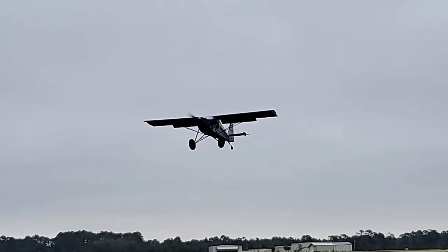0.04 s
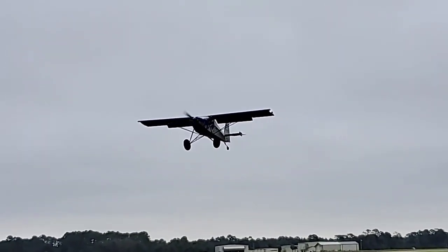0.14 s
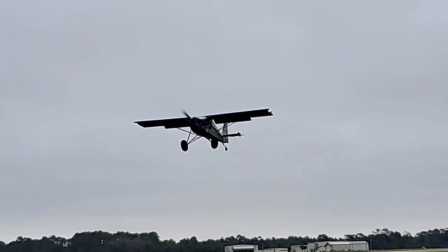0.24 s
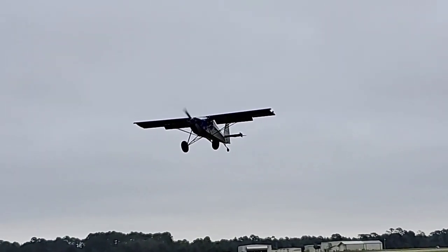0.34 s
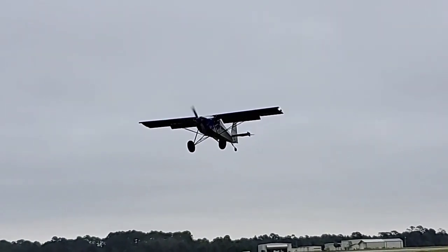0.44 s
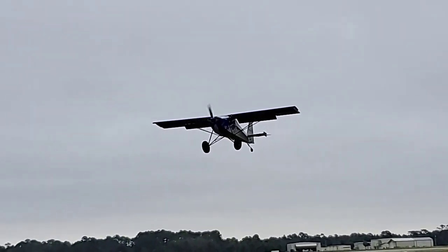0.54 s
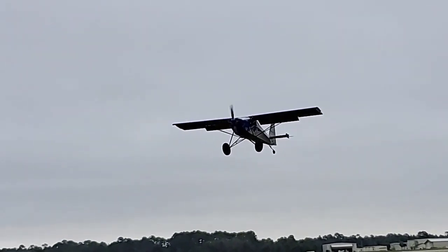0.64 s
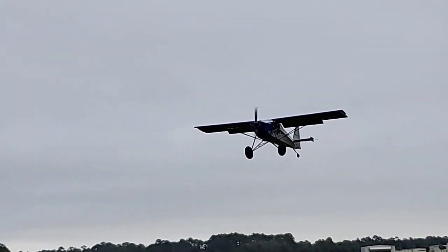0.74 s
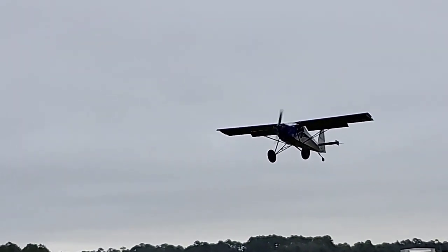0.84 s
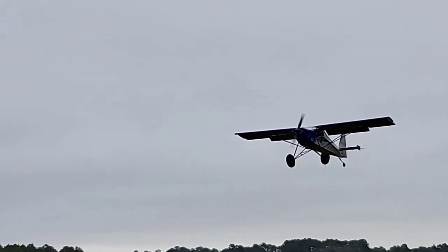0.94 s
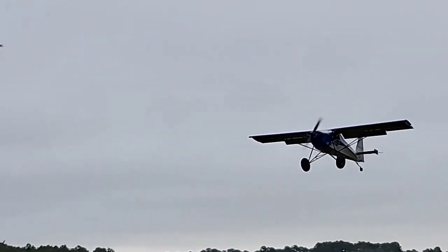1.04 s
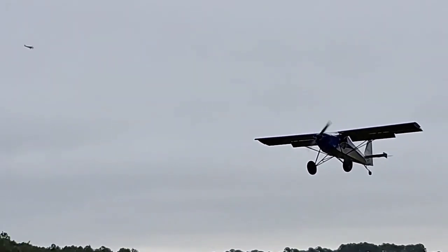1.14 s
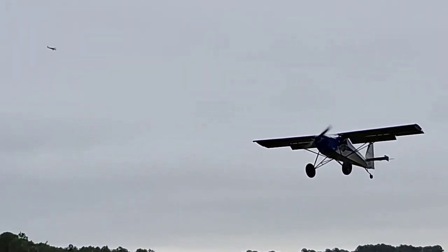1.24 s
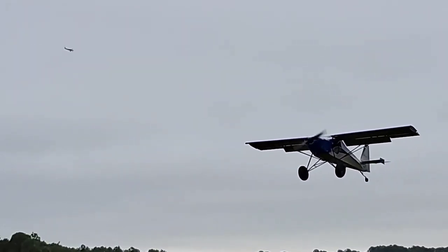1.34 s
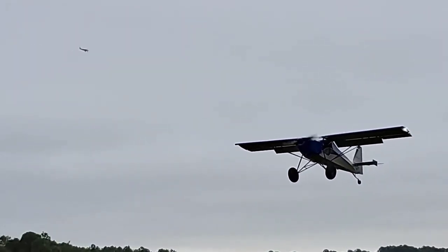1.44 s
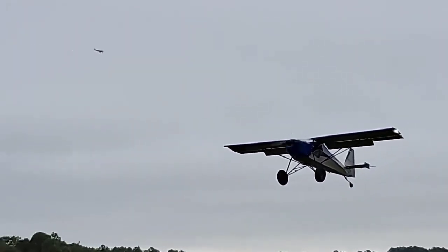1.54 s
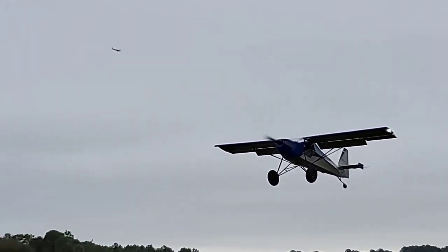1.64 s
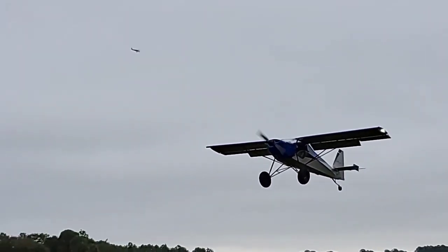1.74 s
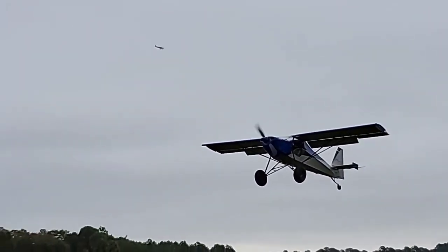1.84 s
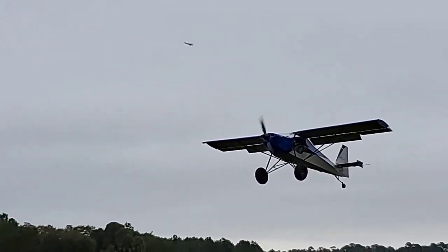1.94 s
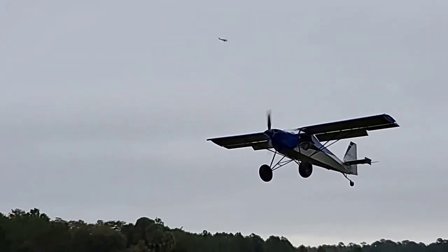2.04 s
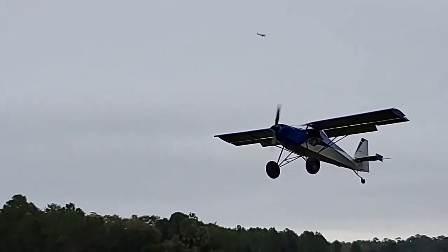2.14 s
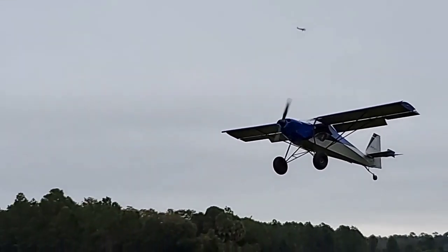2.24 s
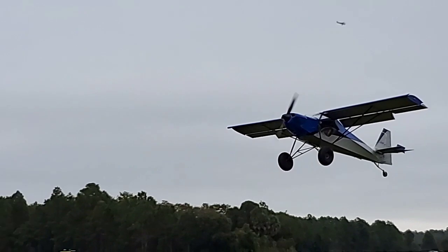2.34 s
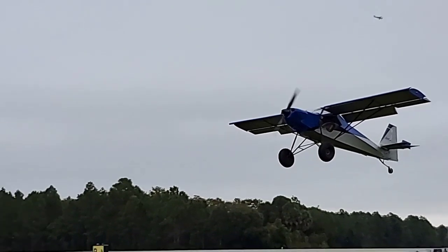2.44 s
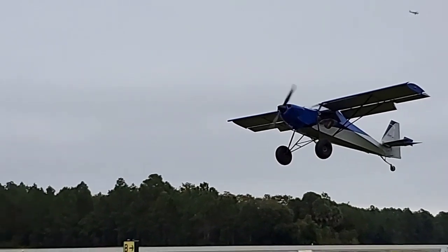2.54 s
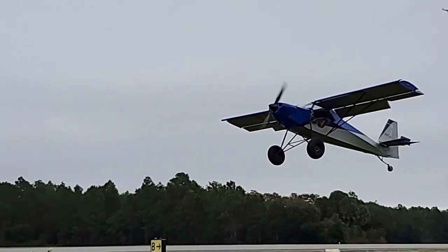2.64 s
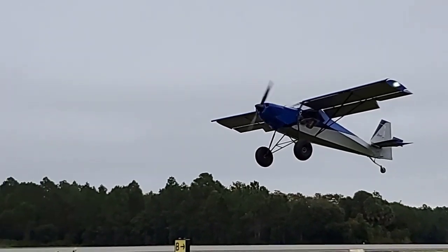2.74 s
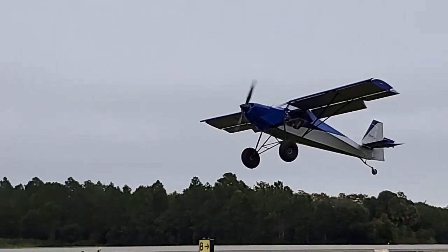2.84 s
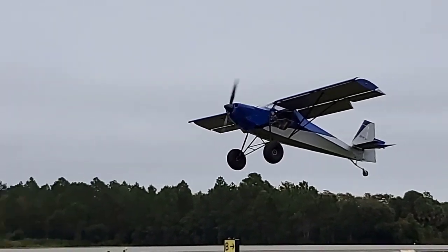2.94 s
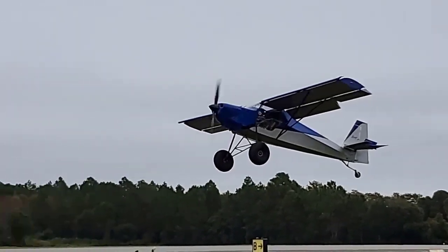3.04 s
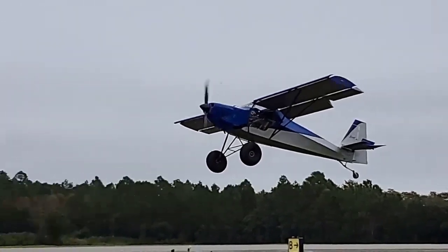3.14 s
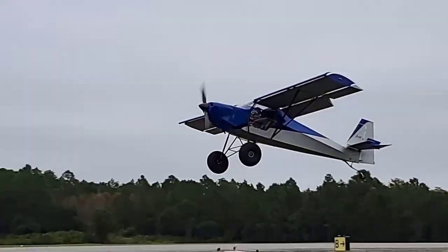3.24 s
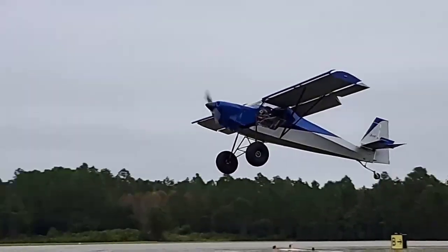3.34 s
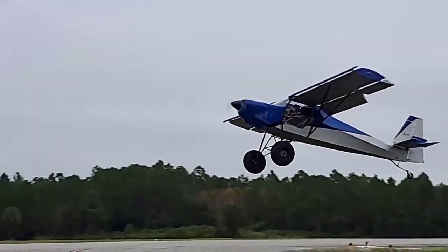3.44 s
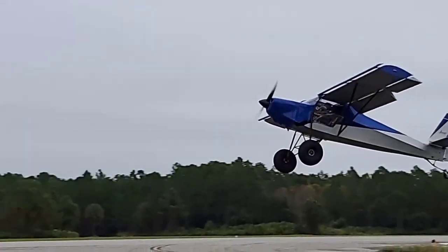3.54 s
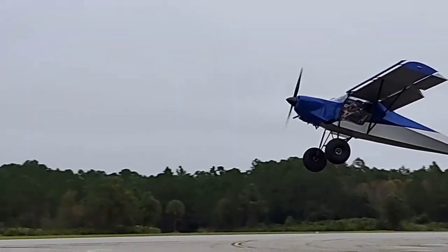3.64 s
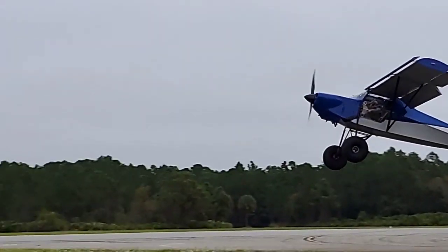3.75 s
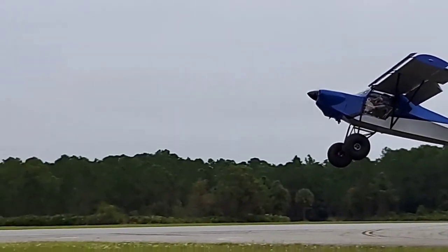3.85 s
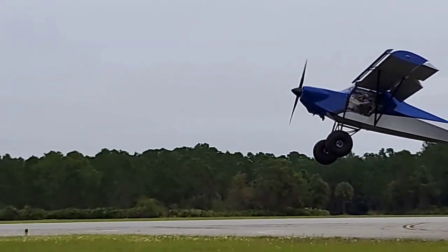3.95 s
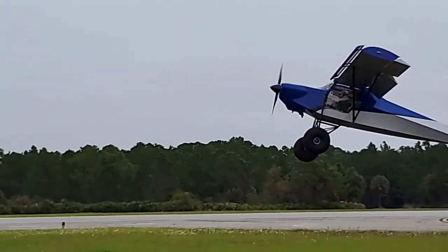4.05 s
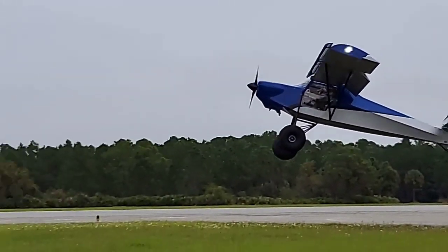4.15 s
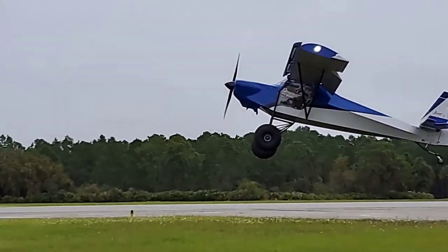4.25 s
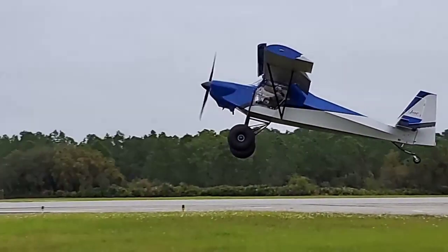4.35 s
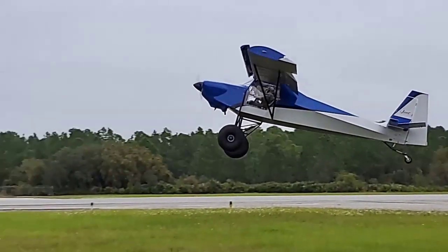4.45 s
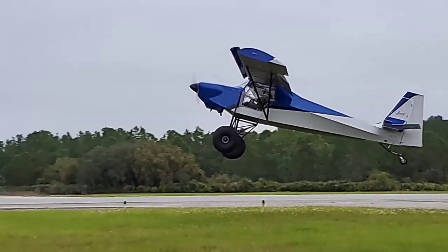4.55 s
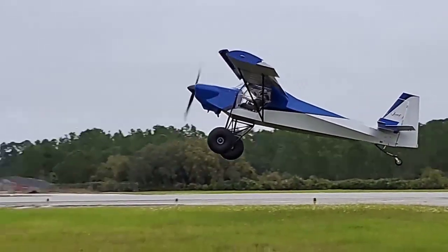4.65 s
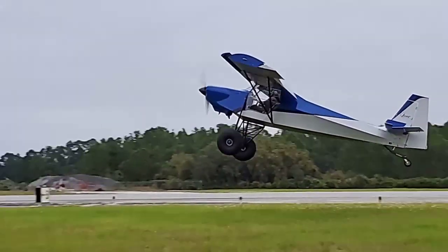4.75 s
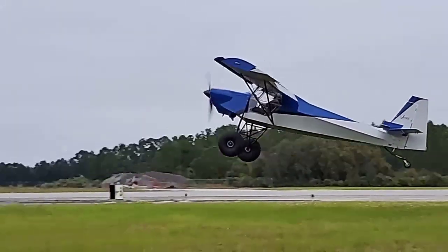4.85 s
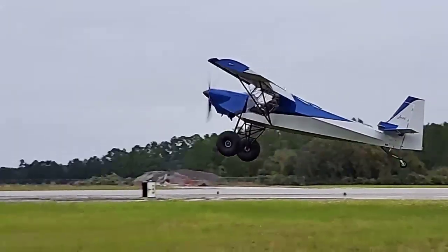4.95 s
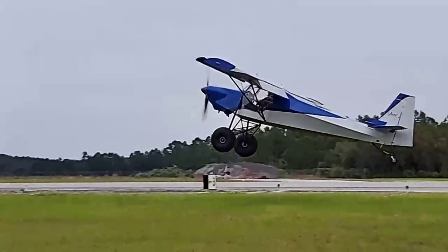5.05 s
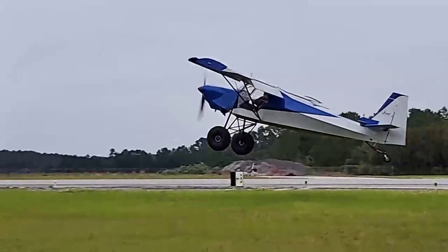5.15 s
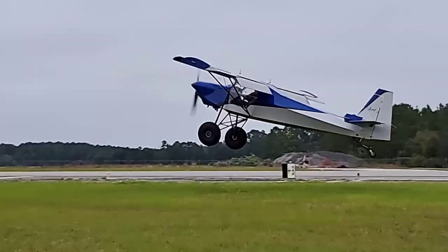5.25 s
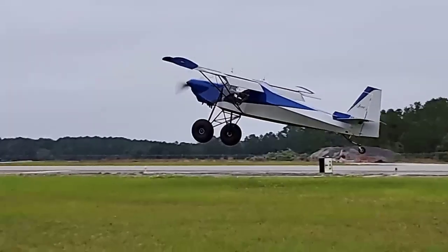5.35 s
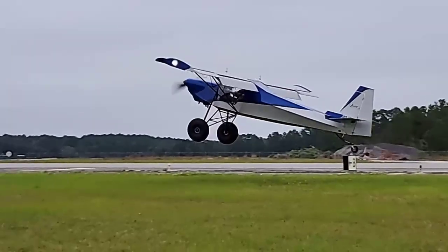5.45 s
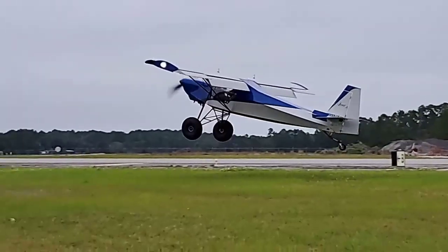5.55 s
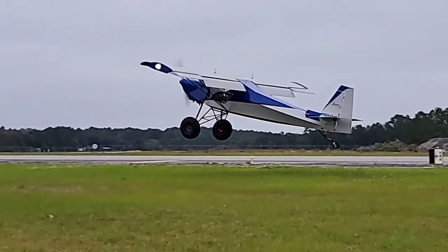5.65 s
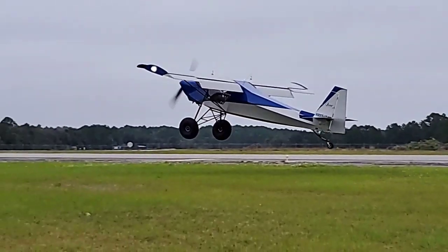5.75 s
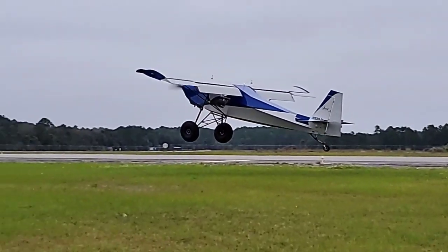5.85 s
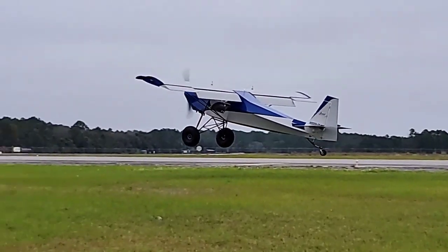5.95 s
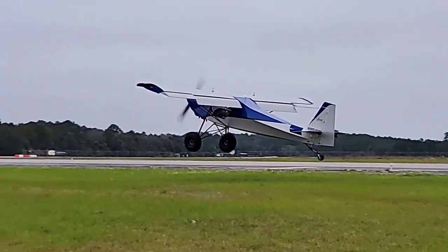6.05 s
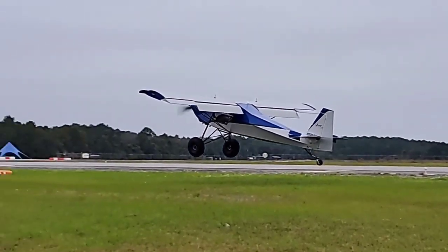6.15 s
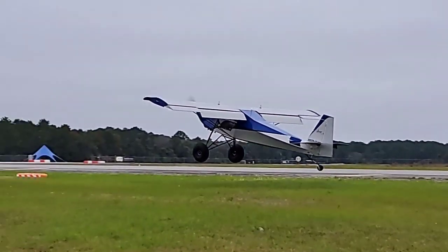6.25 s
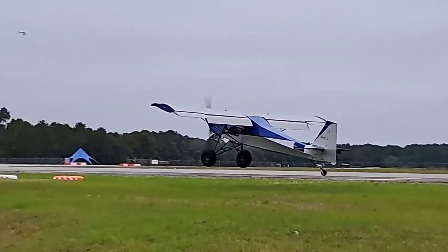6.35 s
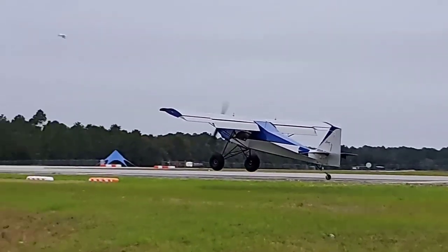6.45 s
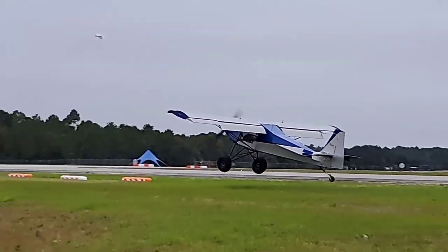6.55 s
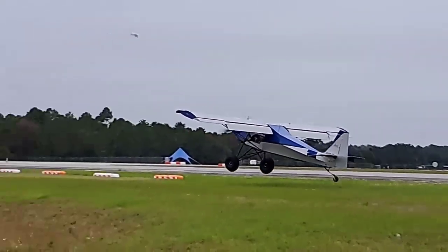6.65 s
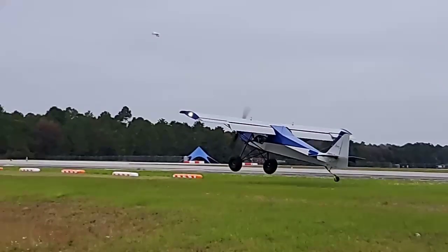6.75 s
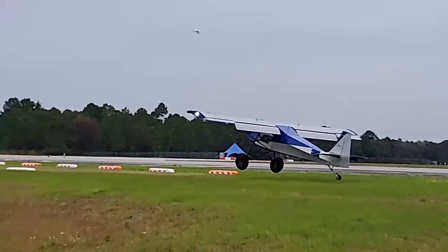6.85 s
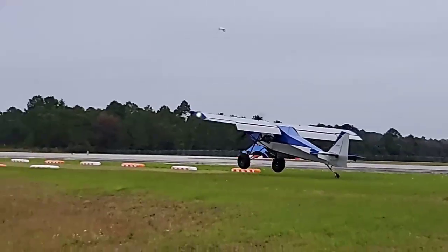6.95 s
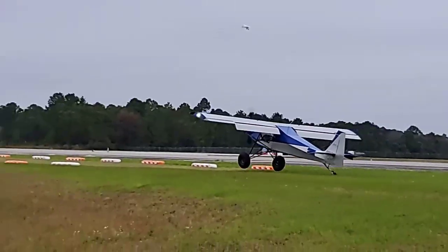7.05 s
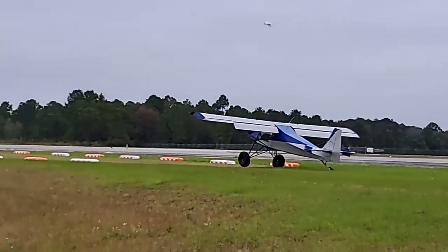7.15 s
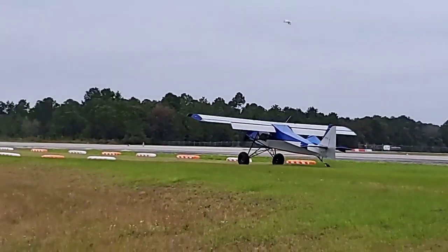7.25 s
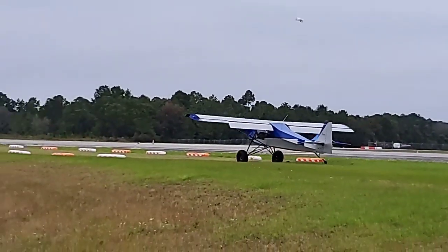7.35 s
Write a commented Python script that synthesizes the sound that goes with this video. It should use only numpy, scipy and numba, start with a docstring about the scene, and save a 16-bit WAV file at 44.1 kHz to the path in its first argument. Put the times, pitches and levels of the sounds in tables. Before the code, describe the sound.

A single light aircraft comes in to land, idling with a lopsided putter and airy hiss. The exhaust grows louder and barkier, with a strong pop before the close pass, then knocks, ticks and a brief rasp abeam. Afterwards its chuff becomes raspy, slows and fades. A far engine hums steadily behind; wind gusts buffet the single outdoor microphone, with a dull reflection off the grass.

```python
"""A distant engine drones and a faint whistle wavers as a light propeller plane glides in at idle.
Its four cylinders kick, chuff and bark through resonant pipework in a lopsided cycle, with pops and ticks.
Low and close, thuds and a propeller rasp stand out; noise shaped as air rushes over it and off the ground.
Going away its chuff turns to a rasp, its engine slows, and gusts of rumble and burble grow rougher."""
import sys
import numpy as np
from scipy import signal
from scipy.fft import rfft, irfft, next_fast_len
from scipy.io import wavfile
from scipy.ndimage import uniform_filter1d
from numba import njit

SR = 44100
rng = np.random.default_rng(int(sys.argv[2]) if len(sys.argv) > 2 else 0)


def unload_audio(sound):
    """Save the sound as a 16-bit wav file, at the path given as the first command line argument."""
    columns = np.transpose(np.atleast_2d(sound))
    # keep every value between -1 and 1, then stretch to whole-number steps
    steps = np.round(np.clip(columns, -1, 1) * 32767)
    wavfile.write(sys.argv[1], SR, steps.astype(np.int16))


N = 327203
T = np.arange(N) / SR

# Exhaust harmonics, one row per multiple of the engine cycle rate, from LOWEST_MULTIPLE up.
# Each row: relative level in dB from ahead, from abeam, from behind.
EXHAUST_NOTE = [(-26, -31, -34), (-14, 0, -7), (-17, -12, -9), (-19, -14, -13), (-12, -7, -5), (0, -1, 0),
                (-2, -8, -12), (-15, -15, -20), (-9, -13, -11), (-5, -4, -8), (-18, -9, -18),
                (-15, -13, -15), (-7, -12, -9), (0, -5, -8), (-8, -12, -11), (-28, -15, -21),
                (-10, -9, -15), (-17, -8, -13), (-5, -18, -14), (-23, -20, -24), (-16, -25, -25),
                (-20, -22, -31), (-24, -28, -20), (-28, -21, -35), (-27, -47, -32), (-32, -27, -36)]
LOWEST_MULTIPLE = 3
# Muffler smear: share of the cycle by which the delay grows every ten harmonics, from ahead, abeam, behind.
MUFFLER_SMEAR = (.55, .09, .4)
# How the exhaust radiates at the closest distance: level in dB from ahead, from abeam, from behind,
# then the loss in dB per doubling of distance.
EXHAUST_BEAM = (-17, -21, -21, 4.5)


def exhaust(cycle, kick_place=0.1971):
    """The strongest cylinder kicks the pipe once a cycle; the note changes as the plane shows its side and tail."""
    aspect = side_shown()
    place = cycle - kick_place + .001 * walk(25)
    note = 0
    for side, levels_db in enumerate(np.transpose(EXHAUST_NOTE)):
        wave = ring(levels_db, MUFFLER_SMEAR[side])
        # neighbouring sides crossfade; beyond straight behind the note fades
        share = np.maximum(1 - abs(aspect - side), 0)
        wave_place = np.arange(len(wave)) / len(wave)
        note = note - share * np.interp(place, wave_place, wave, period=1)
    return note * undb(passing(EXHAUST_BEAM) + .5 * walk(38))


def ring(levels_db, smear, size=512):
    """One cycle of a pipe struck once: harmonics of the given levels, the higher ones arriving later."""
    k = np.arange(size // 2 + 1)
    multiples = LOWEST_MULTIPLE + np.arange(len(levels_db))
    outside = np.maximum(k - multiples[-1], 0) + np.maximum(multiples[0] - k, 0)
    level_db = np.interp(k, multiples, levels_db) - np.minimum(outside, 20)
    # folding the cepstrum makes the response causal
    cepstrum = irfft(np.log(undb(level_db)))
    cepstrum[1:size // 2] *= 2
    cepstrum[size // 2 + 1:] = 0
    dispersion = np.exp(-1j * np.pi * smear * (k - 10) ** 2 / 10)
    audible = (k > 1) * (outside < 20)
    return unit(irfft(np.exp(rfft(cepstrum)) * dispersion * audible))


# Place in the cycle (0-1), pitch, peak dB before smoothing; centre and half width of the beam in sides shown.
THUD_PLACE, THUD_HZ, THUD_DB, THUD_ASPECT, THUD_WIDTH = .251, 175, -19, .7, .16


def thud(cycle):
    """While the pipe's mouth faces the microphone, the strongest kick arrives as one firm swing of pressure."""
    age_s = (cycle % 1 - THUD_PLACE) / engine_speed()
    facing = np.exp(-((side_shown() - THUD_ASPECT) / THUD_WIDTH) ** 2)
    push = -undb(THUD_DB) * facing * swing(age_s, THUD_HZ)
    return signal.sosfiltfilt(signal.butter(6, 270, fs=SR, output="sos"), push)


# Exhaust pops. Each row: time in seconds, peak of the swing in dB before the high-pass, its pitch in Hz,
# level of the gruff puff in dB.
EXHAUST_POPS = [(.362, -21, 140, -50), (1.96, -18, 140, -48), (3.3255, -9, 135, -26.5),
                (3.424, -23, 230, -40), (5.41, -16, 130, -44), (5.424, -15, 120, -44),
                (5.848, -17, 130, -42), (6.436, -18, 110, -42)]


def pops(tail_s=.013, crack_hz=330, crack_lead_s=.0038, crack_db=8):
    """Unburnt fuel pops in the muffler: a quick crack, then one deep swing of pressure inside a short gruff puff."""
    swings, puff = np.zeros(N), np.zeros(N)
    for s, db, hz, puff_db in EXHAUST_POPS:
        swings += undb(db) * swing(T - s, hz)
        # the crack's level is set relative to the puff
        swings += undb(puff_db + crack_db) * swing(T - s + crack_lead_s, crack_hz)
        puff += undb(puff_db) * np.exp(-np.minimum(abs(T - s) / tail_s, 20))
    gruff = colour(noise(), [(50, -6), (140, -6), (280, -2), (450, -2), (580, -6), (780, -23), (1500, -52)])
    high_pass = signal.butter(2, 30, "high", fs=SR, output="sos")
    return signal.sosfilt(high_pass, swings) + puff * gruff


# How the bark radiates at the closest distance: level in dB from ahead, from abeam, from behind,
# then the loss in dB per doubling of distance.
BARK_BEAM = (-46, -44.5, -51.5, 5.5)


def bark(cycle, crack_length=.002, crack_delay=.02, crack_share=.62, gas_pulse=4):
    """Each firing cracks the pipe's resonances with a short push and blows a burst of gas through them."""
    # length and delay are shares of the cycle
    crack = resonate(puffs(cycle - crack_delay, crack_length))
    gas = resonate(pulsing(cycle, gas_pulse))
    return ground(crack_share * crack + gas) * undb(passing(BARK_BEAM))


# The chuff of each cylinder. Each row: place in the cycle (0-1), relative level in dB.
CYLINDERS = [(.185, 3), (.425, 2), (.682, 5.5), (.915, 2)]


def puffs(cycle, length=.037, scatter_db=1.8, jitter=.003):
    """Envelope of the firings: each swells and dies within a small part of the cycle, never twice alike."""
    chance = rng.standard_normal((100, len(CYLINDERS)))
    envelope = 0
    for k, (place, db) in enumerate(CYLINDERS):
        turn, age = np.divmod(cycle - place + 1 + jitter * walk(10.1), 1)
        level = undb(db + scatter_db * chance[turn.astype(int), k])
        envelope = envelope + level * age / length * np.exp(-age / length)
    return unit(envelope)


def pulsing(cycle, depth):
    """Noise of steady mean power, part smooth and part released in puffs by the firings."""
    return noise() * np.sqrt((1 + (depth * puffs(cycle)) ** 2) / (1 + depth ** 2))


# Resonances of pipe and cowling. Each row: centre in Hz from ahead, abeam, behind; relative level in dB
# from ahead, abeam, behind; width in Hz of each of the two filter passes.
PIPE_RESONANCES = [(715, 780, 720, 1, -1, 0, 200), (950, 1130, 1000, -12, -9, -12, 220),
                   (1270, 1740, 1600, -11, -9, -12, 280), (2400, 2720, 2650, -2.5, -5, -18, 420),
                   (3350, 3300, 2950, -13, -10, -4, 340), (3750, 4480, 4650, -9, -9, -6, 320),
                   (5050, 5050, 5200, -8, -14, -14, 420)]


def resonate(x):
    """Ring the resonances of pipe and cowling, which shift as the plane turns its side and tail."""
    aspect = side_shown()
    out = 0
    for *sides, width in PIPE_RESONANCES:
        sides_hz, sides_db = np.reshape(sides, (2, -1))
        hz = np.interp(aspect, np.arange(len(sides_hz)), sides_hz)
        db = np.interp(aspect, np.arange(len(sides_db)), sides_db)
        once = band(x, hz, float(width))
        out = out + undb(db) * band(once, hz, float(width))
    return unit(out)


@njit
def band(x, hz, width):
    """State-variable band-pass with a moving centre, gain 1 there."""
    y, b, l = np.empty(len(x)), 0., 0.
    for i in range(len(x)):
        g, k = np.tan(np.pi * hz[i] / SR), width / hz[i]
        v = (b + g * (x[i] - l)) / (1 + g * (g + k))
        b, l, y[i] = 2 * v - b, l + 2 * g * v, k * v
    return y


# Radiation of each layer at the closest distance: level in dB from ahead, from abeam, from behind,
# then the loss in dB per doubling of distance.
SLIPSTREAM_BEAM = (-37, -41, -41.5, 4)
CHUFF_BEAM = (-45.5, -46, -49, 2)
HISS_BEAM = (-42, -47, -48, 6.5)
AIR_BEAM = (-46, -55, -58, 7.5)
# Noise colours from low slipstream to top air. Each row: frequency in Hz, relative level in dB per Hz.
SLIPSTREAM_COLOUR = [(150, -45), (330, -4), (480, 2), (720, 1), (950, -6.5), (1280, -6.5), (1600, -19),
                     (2500, -56)]
CHUFF_COLOUR = [(600, -1.5), (1100, 6), (1550, 0), (1900, 1.5), (2550, -0.5), (3100, -6.5), (3700, -9.5),
                (5000, -16), (9000, -43)]
RASP_COLOUR = [(600, -3), (1100, 0.5), (1550, 9), (2000, -7.5), (2500, -0.5), (3100, 0), (3450, -2),
               (3900, -12.5), (4600, -12), (5200, -22), (6500, -26.5)]
HISS_COLOUR = [(2000, 3), (3400, -1), (4300, 2), (5200, 1.5), (6300, 0), (7800, 3.5), (8900, -8.5),
               (10000, -58), (14000, -38)]
AIR_COLOUR = [(7000, -2.5), (9000, -2.5), (9900, 2), (11000, 6.5), (12500, 5.5), (14000, -6.5)]
# Treble flares. Each row: start in seconds, rise time in seconds, rise of the hiss in dB, rise of the air in dB.
TREBLE_FLARES = [(1.26, .16, 3, 7), (5.82, 0.25, 1.5, 4)]
RASP_ASPECT, RASP_WIDTH = 1.57, 0.61  # centre and half width of the rasp's beam, in sides shown


def airframe(cycle, slip_pulse=0.28, chuff_pulse=0.33, hiss_pulse=0.77, air_pulse=0.6):
    """Slipstream, engine chuff and hiss: turbulent air that pulses with the firings, most of all close by."""
    slip_db, chuff_db = passing(SLIPSTREAM_BEAM), passing(CHUFF_BEAM)
    hiss_db, air_db = passing(HISS_BEAM), passing(AIR_BEAM)
    for s, rise_s, hiss_rise_db, air_rise_db in TREBLE_FLARES:
        hiss_db = hiss_db + hiss_rise_db * flare(s, rise_s)
        air_db = air_db + air_rise_db * flare(s, rise_s)
    # the pulsing deepens as the chuff gets louder
    near = np.sqrt(undb(chuff_db - chuff_db.max()))
    slip = colour(pulsing(cycle, slip_pulse * near), SLIPSTREAM_COLOUR) * undb(0.29 * walk(21))
    chuff = colour(pulsing(cycle, chuff_pulse * near), CHUFF_COLOUR)
    hiss = colour(pulsing(cycle, hiss_pulse * near), HISS_COLOUR)
    rasp = colour(pulsing(cycle, chuff_pulse * near), RASP_COLOUR)
    air = colour(pulsing(cycle, air_pulse * near), AIR_COLOUR) * undb(air_db + 1.0 * walk(42))
    # heard from the rear quarter, the chuff turns into a narrower rasp
    behind = np.exp(-((side_shown() - RASP_ASPECT) / RASP_WIDTH) ** 2)
    chuff = np.sqrt(1 - behind) * chuff + np.sqrt(behind) * rasp
    low = ground(slip) * undb(slip_db) + ground(chuff) * undb(chuff_db)
    return low + hiss * undb(hiss_db) + air


def flare(s, rise_s):
    """A swell from 0 to 1 that rises quickly and dies away."""
    age = np.maximum(T - s, 0) / rise_s
    return age * np.exp(1 - age)


# Ground reflection. Each row: time in seconds, lag in ms, strength (0-1) at the closest distance
# before the loss and low-pass below.
GROUND_REFLECTION = [(0, 1.72, .55), (1.2, 1.58, .55), (2.5, 1.33, .55), (3.8, 1.16, .65), (4.6, 1.06, .65),
                     (5.4, 1.05, .65), (6.1, 1.1, .45), (7.42, 1.15, .35)]
GROUND_LOSS_DB, GROUND_TOP_HZ = 3, 2100  # loss per doubling of distance, upper edge


def ground(x):
    """Add the reflection off the grass, which swallows its treble; its changing lag sweeps the comb."""
    lag_ms, strength = curves(GROUND_REFLECTION)
    late = np.interp(T - lag_ms / 1000, T, x)
    low_pass = signal.butter(2, GROUND_TOP_HZ, fs=SR, output="sos")
    share = strength * undb(-GROUND_LOSS_DB * doublings())
    return unit(x + share * signal.sosfiltfilt(low_pass, late))


# Colour of the propeller rasp. Each row: frequency in Hz, relative level in dB per Hz.
PROPELLER_COLOUR = [(900, -25), (1600, 0), (2100, 3), (2700, 7), (3400, -1), (4300, -3), (5000, -14),
                    (8000, -28)]
PROP_S, PROP_LENGTH_S, PROP_DB = 4.61, 0.096, -45  # crest time, half length, level at the crest


def propeller(cycle, pulse=0.39):
    """A broad rasp of pulsing noise that stands out while the propeller disc is edge-on."""
    edge_on = 1 / (1 + ((T - PROP_S) / PROP_LENGTH_S) ** 2)
    return colour(pulsing(cycle, pulse), PROPELLER_COLOUR) * edge_on * undb(PROP_DB)


def flutter(x, flutter_db=1.1, rate=45):
    """Turbulent air lifts and drops each half octave on its own, so no two puffs share a colour."""
    size = next_fast_len(N)
    spectrum = rfft(x, size)
    centres = np.arange(12)
    hz = np.maximum(np.fft.rfftfreq(size, 1 / SR), 1)
    half_octave = np.clip(2 * np.log2(hz / 300), 0, centres[-1])
    out = 0
    for k in centres:
        part = irfft(spectrum * np.maximum(1 - abs(half_octave - k), 0), size)[:N]
        out = out + part * undb(flutter_db * walk(rate))
    return out


# Knocks in the pipe. Each row: time in seconds, starting level in dB.
PIPE_KNOCKS = [(3.669, -33), (3.762, -31), (3.834, -33), (4.019, -33), (4.199, -32), (4.382, -33),
               (4.532, -33), (5.052, -31), (5.14, -32), (5.423, -33)]


def knocks(decay_s=.008):
    """Now and then a hard firing knocks on the pipe: a decaying burst of low-weighted noise, resonated."""
    body = colour(noise(), [(500, -6), (800, 0), (1100, 2), (1700, -4), (2600, -18), (5000, -30)])
    return strikes(PIPE_KNOCKS, decay_s) * resonate(body)


# Metallic ticks of the engine. Each row: time in seconds, starting level in dB before the halving below.
ENGINE_TICKS = [(3.1218, -35), (3.265, -35), (3.763, -35), (3.8332, -31.5), (3.9266, -34), (3.9954, -33.5),
                (4.382, -29), (4.5166, -34), (4.5825, -33.5), (4.607, -31), (4.785, -32), (5.539, -33),
                (5.8142, -36), (6.8508, -38)]
# Colour of a tick. Each row: frequency in Hz, relative level in dB per Hz.
TICK_COLOUR = [(600, -11), (2500, 5), (5000, 9), (8000, -6), (9300, -8), (11000, -8), (14000, -26)]


def ticks(decay_s=.005):
    """Brief bright clacks from the engine and its gearbox: decaying noise, ringing in the cowling."""
    clack = colour(noise(), TICK_COLOUR)
    return strikes(ENGINE_TICKS, decay_s) * unit(clack + resonate(clack)) / 2


# Gear whine. Each row: time in seconds, rms level in dB before its random waver.
GEAR_WHINE = [(0, -49.5), (.6, -50.5), (.9, -57), (5, -64), (6.5, -61), (7.42, -61)]


def whine():
    """Gear teeth mesh 57 times an engine cycle: one wavering sine that follows the engine speed."""
    level_db, = curves(GEAR_WHINE)
    return tone(57 * engine_speed(), level_db + 2.2 * walk(9.0))


# Rough air. Each row: time in seconds, rumble in dB, burble in dB, both before the gusts.
ROUGH_AIR = [(0, -34, -40), (1.1, -32.5, -36.5), (2.6, -30.5, -34.5), (3.3, -28, -35.5), (3.7, -31, -36),
             (4.5, -34, -30), (5, -33, -31), (5.6, -27, -30), (6.7, -27, -33.5), (7.42, -25.5, -30)]
# Gusts on top. Each row: crest in seconds, half length in seconds, rise of the rumble in dB,
# rise of the burble in dB, buffeting at the crest in dB.
GUSTS = [(.4, .12, 3.5, 4.5, -54), (2.0, .2, 3, 3.5, -60), (3.316, .088, 1, 9, -42),
         (3.97, .16, 7, 7, -40.5), (5.3, .2, 3.5, 6, -45), (5.855, .12, 2, 6.5, -40),
         (6.43, .12, 3.5, 2.5, -42), (7.0, .14, 0, 5, -42)]
# Colours of the three layers. Each row: frequency in Hz, relative level in dB per Hz.
RUMBLE_COLOUR = [(15, -43), (28, -9), (42, 10), (80, 15), (120, 8), (150, 5), (250, -90)]
BURBLE_COLOUR = [(90, -65), (140, -2.5), (200, -5), (250, -12.5), (310, -23), (380, -27.5), (480, -50),
                 (900, -115)]
BUFFET_COLOUR = [(180, -20), (270, 0), (340, -2), (420, -9), (560, -28), (900, -60)]


def turbulence():
    """Rough air rumbles and a higher burble swells in the wake; each gust lifts both and buffets at its crest."""
    rumble_db, burble_db = curves(ROUGH_AIR)
    buffet_level = 0
    for s, length_s, rumble_rise_db, burble_rise_db, buffet_db in GUSTS:
        swell = np.exp(-((T - s) / length_s) ** 2)
        rumble_db = rumble_db + rumble_rise_db * swell
        burble_db = burble_db + burble_rise_db * swell
        buffet_level = buffet_level + undb(buffet_db) * swell ** 2
    rumble = colour(noise(), RUMBLE_COLOUR) * undb(rumble_db)
    burble = colour(noise(), BURBLE_COLOUR) * undb(burble_db)
    return rumble + burble + colour(noise(), BUFFET_COLOUR) * buffet_level


# Faint whistle. Each row: time in seconds, pitch in Hz, rms level in dB, both before their random waver.
FAINT_WHISTLE = [(.05, 1660, -62.5), (.27, 1770, -60.5), (.47, 1880, -56), (.62, 1630, -61.5),
                 (.72, 1600, -80)]


def whistle():
    """A faint sine whose pitch and level waver at random around a gliding line."""
    hz, db = curves(FAINT_WHISTLE)
    return tone(hz * (1 + .003 * walk(80)), db + 1.5 * walk(30))


# Distant engine. Each row: time in seconds, firing rate in Hz, base level in dB.
DISTANT_DRONE = [(0, 61.9, -49.5), (1.3, 62.2, -48), (2.8, 62.7, -46), (3.8, 62.9, -49.5),
                 (7.42, 62.8, -53)]
# Its harmonics. Each row: multiple of the firing rate, then dB above the base level at each time above.
DRONE_HARMONICS = [(1, 0, 0, 0, 0, 0), (2, 0, 0, 0, 0, 0), (4, 1, 2, 2, 2, 2), (5, -7, -2, -8, -4, 0),
                   (6, -2.5, -1.5, -2.8, -7, -7), (7, -10, -7, -4.5, -7, -9)]


def drone(fade_db=1.6):
    """A steady engine far away, a stack of sines; the air makes each harmonic fade on its own."""
    hz, db = curves(DISTANT_DRONE)
    times_s = np.transpose(DISTANT_DRONE)[0]
    out = 0
    for multiple, *levels_db in DRONE_HARMONICS:
        harmonic_db = db + np.interp(T, times_s, levels_db) + fade_db * walk(5.6)
        out = out + tone(multiple * hz, harmonic_db)
    return out


# Engine speed. Each row: time in seconds, engine cycles a second in Hz; one cycle holds four firings.
ENGINE_SPEED = [(0, 10.42), (1, 10.35), (2.3, 10.18), (3.5, 10.52), (4.4, 11.14), (5.15, 11.32),
                (5.5, 11.12), (7.42, 9.7)]


def engine_speed():
    """Engine cycles a second, sample by sample."""
    return curves(ENGINE_SPEED)[0]


# Side of the plane that is heard. Each row: time in seconds, side (0 ahead, 1 abeam, 2 behind).
SIDE_SHOWN = [(0, 0.15), (2.9, 0.056), (4.3, 0.63), (5.2, 0.92), (6, 1.47), (7.42, 2.68)]


def side_shown():
    """The side the plane shows to the microphone, sample by sample."""
    return curves(SIDE_SHOWN)[0]


CLOSEST_S, CLOSEST_M, FLIGHT_M_PER_S = 4.786, 14.04, 15.5


def doublings():
    """How often the distance has doubled from its closest point, on a straight flight past the microphone."""
    distance_m = np.hypot(CLOSEST_M, FLIGHT_M_PER_S * (T - CLOSEST_S))
    return np.log2(distance_m / CLOSEST_M)


def passing(beam):
    """Level in dB of one of the plane's sounds, from the side it shows and its distance."""
    *sides_db, loss_db = beam
    return np.interp(side_shown(), np.arange(len(sides_db)), sides_db) - loss_db * doublings()


def swing(age_s, hz):
    """One swing of pressure, up and then down, of peak 1."""
    angle = 2 * np.pi * hz * age_s
    return -angle * np.exp((1 - np.minimum(angle ** 2, 200)) / 2)


def strikes(table, decay_s):
    """Envelope of sudden blows that die away, one for each row of seconds and dB."""
    envelope = np.zeros(N)
    for s, db in table:
        during = slice(int(s * SR) + 1, int(s * SR) + SR // 10)
        envelope[during] += undb(db) * np.exp((s - T[during]) / decay_s)
    return envelope


def tone(hz, db):
    """A sine that follows a pitch and an rms level."""
    return np.sqrt(2) * undb(db) * np.sin(2 * np.pi * np.cumsum(hz) / SR)


def noise():
    """White noise."""
    return rng.standard_normal(N)


def walk(rate):
    """Smooth chance of spread 1 that changes about rate times a second."""
    k = max(int(SR / rate), 1)
    once = uniform_filter1d(noise(), k, mode="wrap")
    return unit(uniform_filter1d(once, k, mode="wrap"))


def colour(x, points):
    """Filter x by a spectrum of Hz and dB points, then bring it to rms 1."""
    hz, db = np.transpose(points)
    size = next_fast_len(N)
    f = np.maximum(np.fft.rfftfreq(size, 1 / SR), 1)
    gain = undb(np.interp(np.log(f), np.log(hz), db))
    return unit(irfft(rfft(x, size) * gain, size)[:N])


def curves(table):
    """Each column of a timed table, sample by sample."""
    s, *columns = np.transpose(table)
    return [np.interp(T, s, c) for c in columns]


def undb(db):
    """Decibels to gain."""
    return 10 ** (np.asarray(db) / 20)


def unit(x):
    """Scale to rms 1."""
    return x / np.sqrt(np.mean(x ** 2))


def scene():
    """The plane, the gusts, the whistle and the distant drone at one microphone."""
    cycle = np.cumsum(engine_speed()) / SR
    pulses = exhaust(cycle) + thud(cycle)
    breath = flutter(bark(cycle) + airframe(cycle) + propeller(cycle))
    plane = pulses + breath + knocks() + pops() + ticks() + whine()
    return (plane + turbulence() + whistle() + drone())[None]


def record(dry):
    """A steep low-pass cuts the top above 13.9 kHz."""
    return signal.sosfilt(signal.ellip(10, .2, 80, 13900, fs=SR, output="sos"), dry)


dry = scene()
out = record(dry)
unload_audio(out)
```